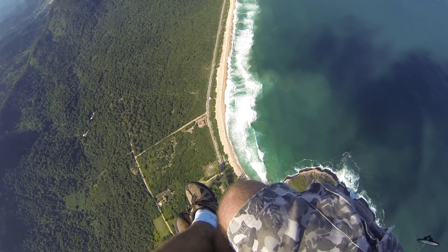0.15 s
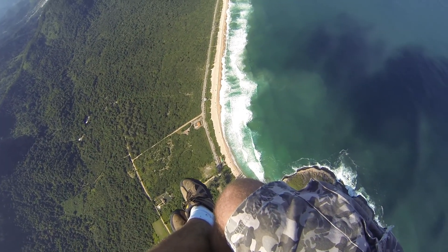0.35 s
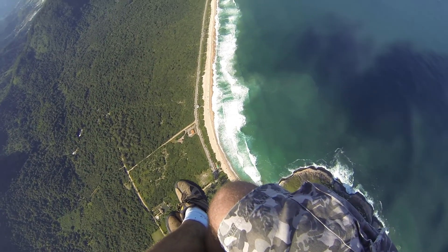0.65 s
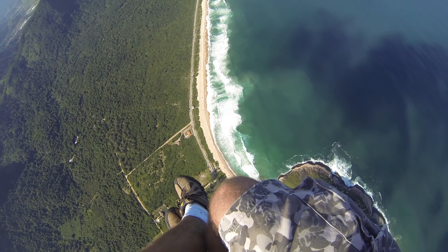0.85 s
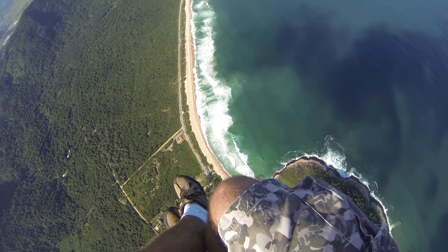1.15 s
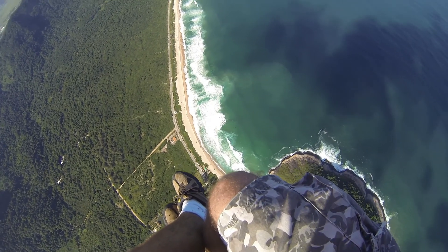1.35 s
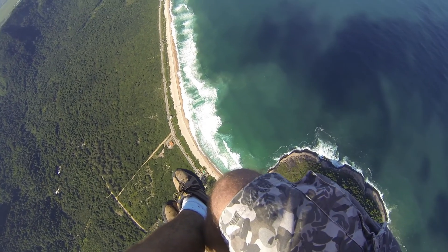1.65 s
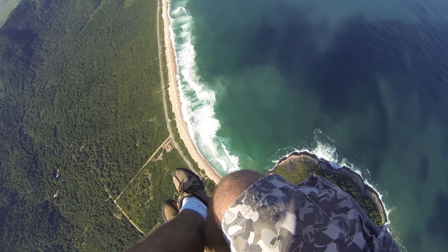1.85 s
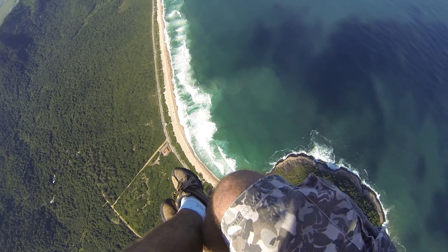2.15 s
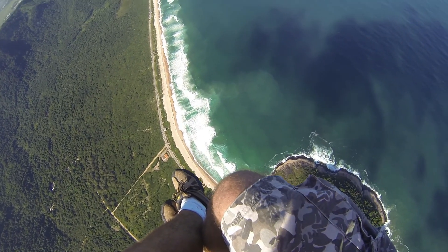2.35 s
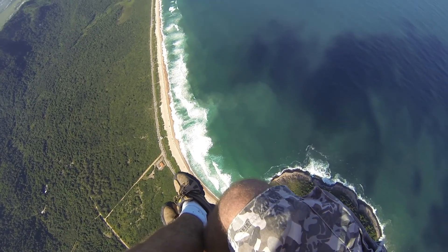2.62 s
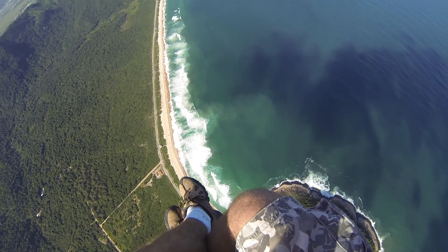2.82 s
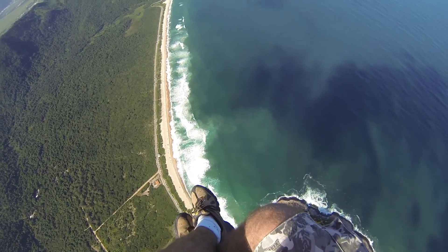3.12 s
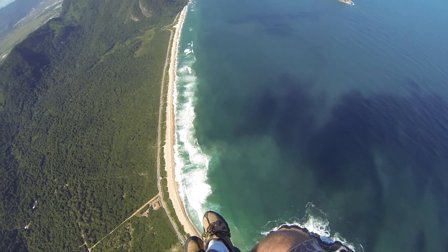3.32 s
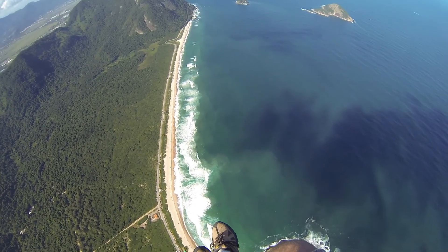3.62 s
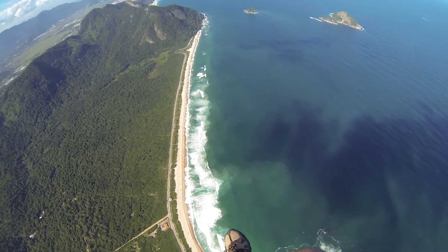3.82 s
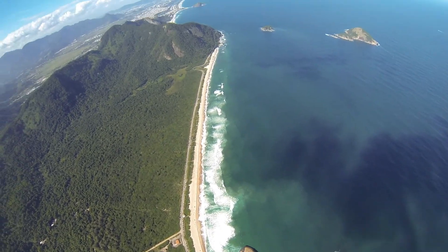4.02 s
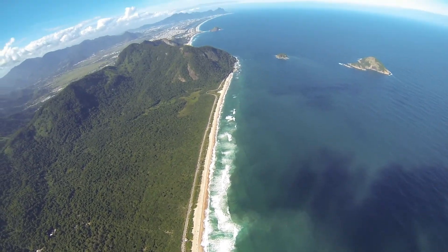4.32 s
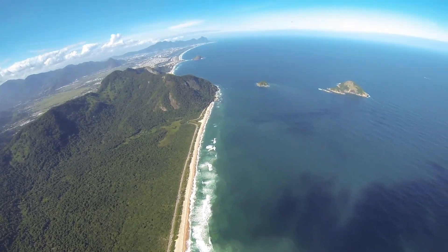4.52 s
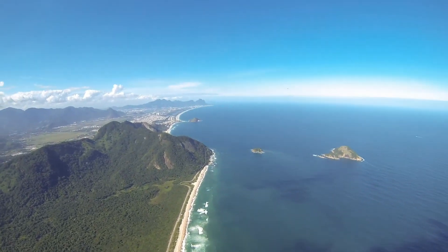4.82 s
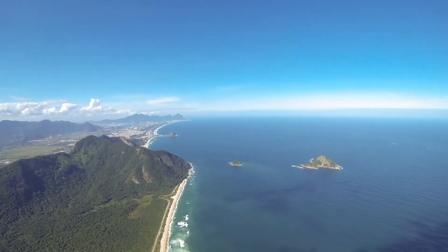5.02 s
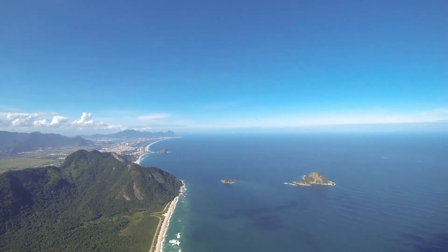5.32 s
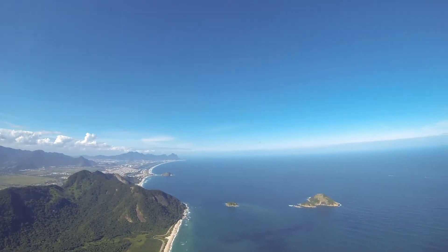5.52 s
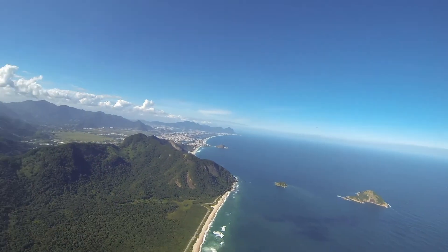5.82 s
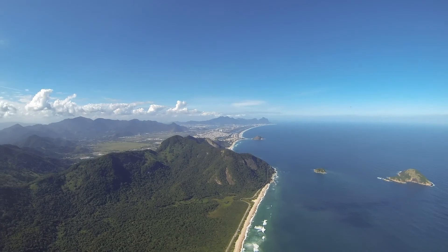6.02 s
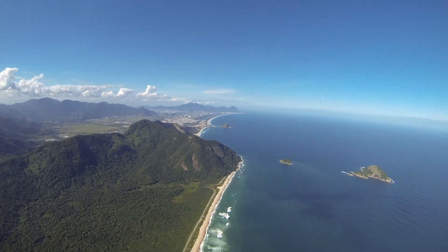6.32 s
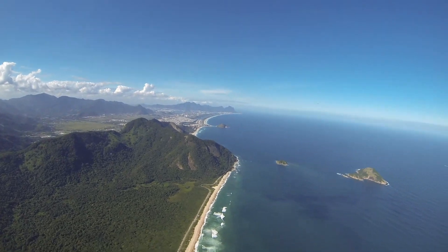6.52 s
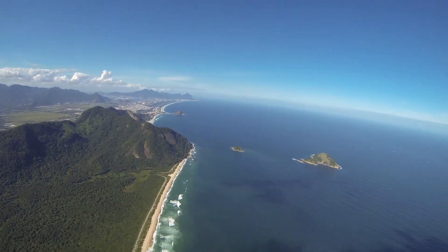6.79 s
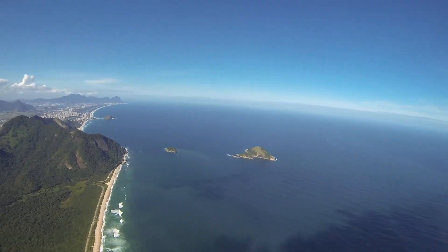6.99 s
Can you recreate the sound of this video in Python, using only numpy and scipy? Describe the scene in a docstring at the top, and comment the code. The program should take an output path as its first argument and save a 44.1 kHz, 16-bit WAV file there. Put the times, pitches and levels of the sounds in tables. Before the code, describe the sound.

A powered paraglider's small engine and propeller drone loudly throughout at a nearly constant pitch, with a chugging exhaust roar and a pulsing rush of air. About halfway, as the pilot looks up, the drone shifts in tone, a faint hiss comes in and a harness buckle ticks once. Wind then buffets the head-worn microphone more strongly, high in the open air.

```python
"""A paramotor engine drones high in the air, heard from a camera on the pilot's head.
Its geared propeller beats against it; the exhaust roars and the blades churn the air into a pulsing rush.
Half-way the pilot looks up from the ground to the horizon: the drone changes colour,
the airstream hisses over the helmet, a harness buckle ticks and more wind buffets the microphone."""
import sys
import numpy as np
from scipy import signal
from scipy.fft import rfft, irfft, next_fast_len
from scipy.io import wavfile
from scipy.ndimage import uniform_filter1d, minimum_filter1d, map_coordinates

SR = 44100
rng = np.random.default_rng(int(sys.argv[2]) if len(sys.argv) > 2 else 0)


def dump(signal):
    """Clip the signal to [-1, 1] and save it as 16-bit WAV at the path in sys.argv[1]."""
    limited = np.clip(np.atleast_2d(signal).T, -1, 1)
    pcm = np.round(limited * 32767).astype(np.int16)
    wavfile.write(sys.argv[1], SR, pcm)


N = 315315

# exhaust and casing tones: (order [x cycle rate], looking down [dB], looking ahead [dB])
ENGINE_TONES = [(1, -6.5, -11.0), (2, -1.7, -6.5), (3, -2.8, -6.8), (4, -20.5, -18.5), (5, -14.0, -13.5),
                (6, -19.0, -14.0), (7, -10.5, -14.0), (8, -13.0, -17.5), (9, -13.0, -24.5),
                (10, -10.0, -18.0), (11, -15.5, -13.0), (12, -20.0, -15.5), (13, -13.5, -19.0),
                (14, -24.5, -16.0), (15, -26.0, -21.5), (16, -19.5, -31.0), (17, -28.0, -25.0),
                (18, -27.0, -17.0), (19, -20.5, -23.5), (20, -35.5, -16.0), (21, -28.0, -23.0),
                (22, -17.0, -16.0), (23, -18.0, -31.5), (24, -25.5, -21.5), (25, -31.5, -18.0),
                (26, -15.5, -15.0), (27, -19.0, -19.5), (28, -22.5, -20.0), (29, -39.5, -20.0),
                (30, -27.0, -26.0), (31, -21.0, -22.0), (32, -35.0, -29.0), (33, -30.0, -26.0),
                (34, -31.0, -34.5), (35, -31.0, -30.5), (37, -32.0, -36.5), (40, -30.0, -42.0),
                (41, -27.0, -40.0), (42, -35.0, -32.0), (43, -27.5, -40.0), (120, -46.5, -58)]
# reflections off the pilot's body: (order [x cycle rate], pose [0..1], half-width [pose], gain [dB])
BODY_REFLECTIONS = [(2, .15, .15, 1.2), (5, .25, .1, 5), (6, .33, .16, 5.5), (7, .28, .1, 1.5),
                    (9, .3, .08, 2), (9, .7, .12, 4), (10, .4, .18, 2), (11, .4, .2, -1.5),
                    (13, .45, .16, -5)]


def engine(cycle, pose):
    """Each firing sends out a push and a suction, a little uneven in time and strength."""
    lag_turns = .15
    turns = cycle - lag_turns + .0005 * wobble(70)
    strength = amp(.7 * wobble(60))
    return strength * pulse_train(ENGINE_TONES, np.sin, turns, pose, flutter_db=1.25,
                                  scatter_turns=.0392, reflections=BODY_REFLECTIONS, smear_turns=.032)


# propeller tones: (order [x blade rate], looking down [dB], looking ahead [dB])
BLADE_TONES = [(1, 0.0, 1.0), (2, -11.0, -15.0), (3, -11.5, -16.0), (4, -21.0, -17.5), (5, -14.5, -16.5),
               (6, -21.5, -21.0), (7, -15.0, -16.5), (8, -20.0, -15.5), (9, -21.0, -17.5),
               (11, -19.5, -22.0), (12, -17.0, -30.5), (13, -22.0, -29.5), (14, -19.0, -25.0),
               (15, -30.5, -25.5), (16, -12.0, -18.5), (18, -30.5, -25.0), (19, -20.0, -31.0),
               (20, -28.0, -26.0), (27, -24.0, -29.0), (28, -18.0, -30.5), (29, -21.5, -30.0),
               (30, -17.3, -35.0), (31, -23.5, -41.5), (32, -28.0, -41.5)]


def propeller(blade, pose):
    """The blades chop through the pilot's turbulent wake, each leaving a suction."""
    lag_turns = .08
    turns = blade - lag_turns + .0007 * wobble(45)
    strength = amp(.6 * wobble(30))
    return strength * pulse_train(BLADE_TONES, np.cos, turns, pose, flutter_db=0, scatter_turns=.0509)


def pulse_train(tones, wave, turns, pose, flutter_db, scatter_turns, reflections=(), smear_turns=0):
    """One pressure pulse a turn: low harmonics arrive together, the frame scatters higher ones."""
    firm_below_order, casing_order = 8.5, 21
    out = np.zeros(N)
    for order, down_db, ahead_db in tones:
        loose = min(1, order / firm_below_order)  # low harmonics bend round the head and flutter less
        level_db = down_db + pose * (ahead_db - down_db)  # head shadow
        level_db += flutter_db * loose * wobble(7)
        level_db += sum(db * bell(pose, at, width) for k, at, width, db in reflections if k == order)
        scatter = scatter_turns * order * rng.standard_normal()
        smear = smear_turns * (order < casing_order) * wobble(22)  # moving air blurs the exhaust tones
        out -= amp(level_db) * wave(2 * np.pi * (order * turns + loose * (scatter + smear)))
    return np.sqrt(2) * out


# engine speed: (time [s], cycle rate [Hz])
CYCLE_RATE = [(0, 39.57), (0.65, 39.94), (1.25, 40.45), (1.5, 40.99), (1.85, 40.84), (2.25, 41.05),
              (2.5, 40.81), (2.8, 40.87), (3.3, 40.83), (3.6, 40.67), (3.8, 40.9), (4.45, 40.51),
              (4.7, 41.2), (5, 40.99), (5.6, 41.03), (6.25, 40.82), (6.5, 41.08), (6.8, 40.87),
              (7.15, 40.93)]


def shaft():
    """Running counts of engine cycles and blade passes; they fall in and out of step and chug."""
    passes_per_cycle = 1.3467  # two blades behind the reduction drive
    cycle = np.cumsum(curves(CYCLE_RATE)[0]) / SR
    return cycle, passes_per_cycle * cycle


# roar, looking down: (frequency [Hz], relative density [dB])
ROAR_DOWN_SPECTRUM = [(50, -29), (130, -0.5), (220, -1.5), (400, -2), (600, -6), (760, -4), (880, -1),
                      (1100, -4.5), (1300, -15.5), (1600, -45), (3000, -83)]
# roar, looking ahead: (frequency [Hz], relative density [dB])
ROAR_AHEAD_SPECTRUM = [(50, -28), (130, 1.5), (220, -3), (400, -4.5), (620, -5.5), (760, -4), (880, -2),
                       (1100, -5.5), (1300, -11), (1600, -42), (3000, -86)]


def exhaust_roar(cycle, blade, pose):
    """Exhaust and intake noise puffs on every piston stroke; it loses body as the head is raised."""
    puffs = 1 + .9 * bursts(4 * cycle, 1.5) + .3 * bursts(cycle - .5, 3) + .3 * bursts(blade, 1.5)
    puffs *= amp((2 + .2 * pose) * wobble(150))
    down = noise(ROAR_DOWN_SPECTRUM, puffs)
    ahead = amp(.8) * noise(ROAR_AHEAD_SPECTRUM, puffs)
    return np.sqrt(1 - pose) * down + np.sqrt(pose) * ahead


# propeller rush: (frequency [Hz], relative density [dB])
RUSH_SPECTRUM = [(900, -18.5), (1350, -3), (1650, 1), (1980, 1.5), (2250, -5.5), (2600, -9.5), (2900, -8),
                 (3300, -11.5), (3700, -22.5), (4400, -28.5), (5100, -29), (6000, -38.5), (6500, -32.5),
                 (7300, -65)]


def propeller_rush(cycle, blade, pose):
    """Air torn by the blades pulses on each stroke, more sharply once a cycle."""
    pulses = 1 + .75 * bursts(4 * cycle, 1.5) + .5 * bursts(cycle - .5, 9) + .4 * bursts(blade, 1.5)
    envelope = pulses * np.sqrt(rasp(cycle, blade, pose)) * amp(1.18 * wobble(200))
    return amp(-.5) * noise(RUSH_SPECTRUM, envelope)


def rasp(cycle, blade, pose):
    """Spikes on each blade pass and firing reach the microphone as the head is raised; mean power 1."""
    spikes = 1 + .47 * pose * (bursts(blade, 12) + bursts(cycle - .5, 18))
    return spikes / np.sqrt(uniform_filter1d(spikes ** 2, size=SR // 2))


# wind on the microphone: (time [s], level [dB])
BUFFET_LEVEL = [(0, -29.5), (1.9, -23.5), (2.7, -22.5), (3.15, -23.5), (4.1, -27), (4.35, -22), (4.9, -21),
                (5.25, -21.5), (5.7, -18), (6.7, -20), (7.15, -17.5)]
# buffeting: (frequency [Hz], relative density [dB])
BUFFET_SPECTRUM = [(4, -26), (12, 0), (25, 5), (32, 3), (42, 2), (70, -3), (100, -6), (150, -17),
                   (300, -36), (1000, -76)]


def buffet(gust_db):
    """Eddies thump on the microphone."""
    lumps = amp(wobble(21))
    return amp(curves(BUFFET_LEVEL)[0] + gust_db) * noise(BUFFET_SPECTRUM, lumps)


# airstream gusts: (time [s], half-width [s], air noise gain [dB], buffet gain [dB])
AIR_GUSTS = [(.52, 0.016, 3, -1), (2.42, 0.017, 4, 1), (2.65, 0.036, 1, 7), (3.43, 0.037, 1, 6),
             (4.58, 0.035, 2.5, 2), (4.74, 0.055, .5, -3), (5.0, 0.031, 0.9, 3), (5.16, 0.028, -0.2, 4.5),
             (5.34, 0.052, 2, 6), (5.48, 0.043, 0, 0.5), (5.61, 0.029, 3.5, 2), (5.785, 0.035, 3, 1),
             (5.95, .012, 1.5, 3), (6.17, 0.024, -0.5, 2), (6.54, 0.015, 2, 2.5), (6.73, 0.051, 1, 0.5),
             (7.03, 0.01, 2.5, 1)]


def gusts():
    """Gusts briefly shift the level of the air noise and of the buffeting; both in dB."""
    t = np.arange(N) / SR
    air_db = sum(db * bell(t, at, width) for at, width, db, _ in AIR_GUSTS)
    buffet_db = sum(db * bell(t, at, width) for at, width, _, db in AIR_GUSTS)
    return air_db, buffet_db


# buckle ticks: (time [s], peak [dB])
BUCKLE_TICKS = [(4.434, -7)]
# buckle modes: (frequency [Hz], relative level [dB], t60 [s])
BUCKLE_MODES = [(1150, 1.5, .022), (1770, 5, .026), (2080, 0, .02), (2290, 1, .02), (2600, 0, .016),
                (2920, -1, .02), (3370, -7, .014), (4400, -19, .012), (5200, -21, .014), (6000, -25, .014)]


def buckle():
    """A harness buckle ticks: a crack and a brief, damped ring."""
    attack_s, crack_t60_s, crack_top_hz = .0005, .0079, 4900
    out, t = np.zeros(N + SR), np.arange(SR // 10) / SR
    for start_s, peak_db in BUCKLE_TICKS:
        ring = sum(amp(db - 60 * t / t60) * np.sin(2 * np.pi * (hz * t + rng.random()))
                   for hz, db, t60 in BUCKLE_MODES)
        crack = signal.lfilter(*signal.butter(8, crack_top_hz, fs=SR), rng.standard_normal(len(t)))
        crack *= .5 * amp(-60 * t / crack_t60_s)
        tick = (ring + crack) * (1 - np.exp(-t / attack_s))
        out[round(start_s * SR):][:len(t)] += amp(peak_db) * tick / np.abs(tick).max()
    return out[:N]


# helmet hiss: (frequency [Hz], relative density [dB])
HISS_SPECTRUM = [(2000, -20), (3600, 11.5), (4500, 1), (5400, 1.5), (6400, -23), (7500, -17.5),
                 (13000, -15), (14000, -35)]
# camera case fizz: (frequency [Hz], relative density [dB])
FIZZ_SPECTRUM = [(4000, -11), (6500, -10), (7300, -57), (7900, -7), (8400, 7), (8900, 4.5), (9500, -5.5),
                 (10300, 5), (10900, 8), (11800, -11), (13200, -17), (14000, -15)]


def airstream(cycle, blade, pose, swell_db):
    """Blade-shaken air hisses on the helmet and fizzes at the camera, louder as the pilot faces it."""
    shake = 1 + .44 * bursts(blade, 3.8) + .35 * bursts(cycle - .5, 6)
    shake *= amp(1.44 * wobble(90) + .57 * wobble(9.2))
    flicker = amp(2.4 * wobble(120) + .79 * wobble(14))
    hiss = amp(-51) * pose * noise(HISS_SPECTRUM, rasp(cycle, blade, pose) * flicker)
    fizz_db = -62.5 + 4.5 * pose + .27 * swell_db
    return hiss + amp(fizz_db) * noise(FIZZ_SPECTRUM, shake)


# level dips: (time [s], depth [dB])
LEVEL_DIPS = [(2.685, 2.5), (4.49, 0.5), (5.05, 4.5), (5.215, 3.3), (5.42, 2), (5.85, 3.5), (6.41, 4.7),
              (6.581, 5), (6.79, 2.5)]


def dips(width_s=.015):
    """A gain that dips briefly at each listed time."""
    t = np.arange(N) / SR
    return amp(-sum(db * bell(t, at, width_s) for at, db in LEVEL_DIPS))


def amp(db):
    """Decibels to gain."""
    return 10 ** (np.asarray(db) / 20)


def bell(x, centre, width):
    """A Gaussian bump of height 1."""
    return np.exp(-.5 * ((x - centre) / width) ** 2)


def bursts(turns, sharpness):
    """A smooth bump of height 1 once a turn."""
    return np.exp(sharpness * (np.cos(2 * np.pi * turns) - 1))


def curves(rows):
    """One value per sample for each column after the time."""
    times, *columns = np.transpose(rows)
    return [np.interp(np.arange(N) / SR, times, column) for column in columns]


def wobble(rate_hz):
    """A smooth random curve through rate_hz knots a second."""
    knots = rng.standard_normal(int(N * rate_hz / SR) + 4)
    coarse = np.linspace(0, N, N // 20)
    return np.interp(np.arange(N), coarse, map_coordinates(knots, [coarse * rate_hz / SR]))


def filtered(x, response):
    """Apply a gain given as a function of frequency in Hz."""
    size = next_fast_len(N + SR // 2)
    return irfft(rfft(x, size) * response(np.fft.rfftfreq(size, 1 / SR)), size)[:N]


def noise(spectrum, envelope):
    """Modulated noise of rms 1, coloured by (Hz, dB) points."""
    points_hz, db = np.transpose(spectrum)
    white = envelope * rng.standard_normal(N)
    coloured = filtered(white, lambda hz: amp(np.interp(np.log(hz + 1), np.log(points_hz), db)))
    return coloured / np.sqrt(np.mean(coloured ** 2) + 1e-20)


# pilot's head: (time [s], pose [0 looking down .. 1 looking ahead])
HEAD_POSE = [(0, 0.06), (1.5, 0.024), (2.6, 0.21), (3.2, 0.48), (3.7, 0.36), (4.5, 0.93), (5.5, 0.96),
             (7.15, 1)]
# motor at the microphone as the pilot moves: (time [s], drone [dB], roar [dB], rush [dB])
MOTOR_LEVELS = [(0, -21.5, -23, -32), (.6, -21, -23, -32), (1, -22.5, -24, -31.5), (1.6, -22.5, -24, -32),
                (2.15, -22, -23.5, -32), (2.4, -22, -24, -32.5), (2.85, -22, -23, -31.5),
                (3.05, -23, -24, -32.6), (3.35, -21.5, -24.2, -31.5), (3.6, -22, -22.5, -29),
                (4, -19.5, -21.5, -27.5), (4.35, -20.5, -24.5, -30.5), (4.85, -21, -23.5, -30),
                (5.2, -23.5, -25.5, -33), (5.7, -23, -26, -32.5), (6.3, -23.5, -25.7, -31.5),
                (6.95, -21.5, -23.5, -30.5), (7.15, -22, -23.5, -33)]


def scene():
    """One shaft drives the motor's sounds; head pose sets the colour, gusts swell the turbulence."""
    cycle, blade = shaft()
    pose = np.clip(curves(HEAD_POSE)[0], 0, 1)
    drone_db, roar_db, rush_db = curves(MOTOR_LEVELS)
    air_gust_db, buffet_gust_db = gusts()
    drone = amp(drone_db) * (engine(cycle, pose) + propeller(blade, pose))
    roar = amp(roar_db) * exhaust_roar(cycle, blade, pose)
    rush = amp(rush_db) * propeller_rush(cycle, blade, pose)
    turbulence = amp(.76 * wobble(16)) * (roar + rush)
    air = turbulence + airstream(cycle, blade, pose, swell_db=rush_db - rush_db.mean())
    flight = drone + amp(air_gust_db) * air + buffet(buffet_gust_db)
    return (dips() * flight + buckle())[None]


def record(dry):
    """The camera turns the gain down around peaks and keeps nothing above its band limit."""
    ceiling_db, hold_s, top_hz = -2.5, .02, 13900
    window = int(hold_s * SR)
    needed_gain = np.minimum(1, amp(ceiling_db) / (np.abs(dry[0]) + 1e-9))
    gain = uniform_filter1d(minimum_filter1d(needed_gain, window), window)
    return filtered(gain * dry[0], lambda hz: hz < top_hz)[None]


dry = scene()
out = record(dry)
dump(out)
```